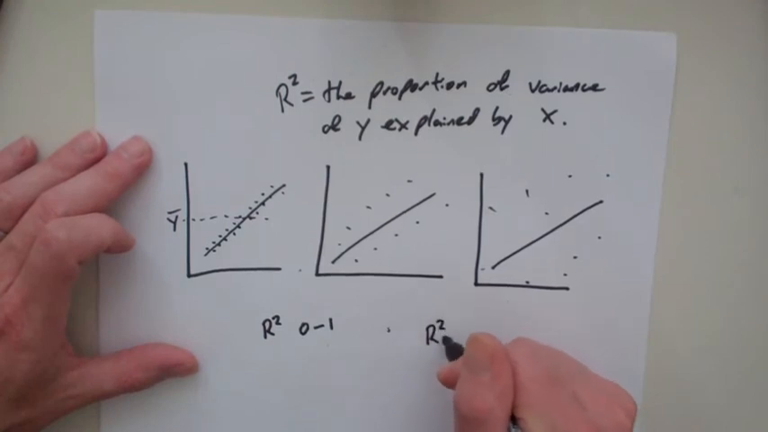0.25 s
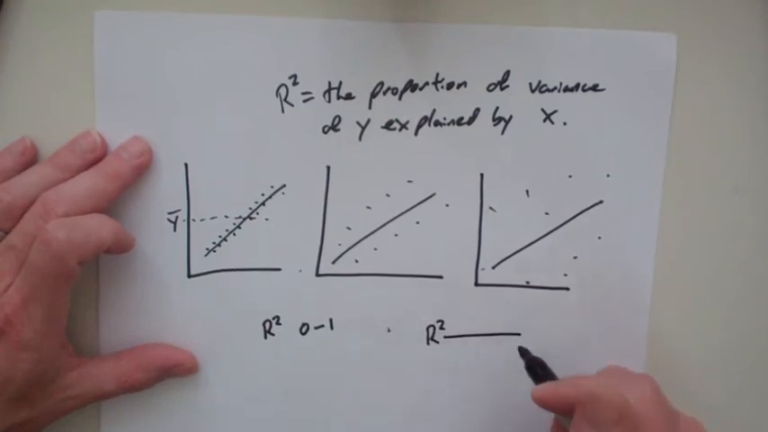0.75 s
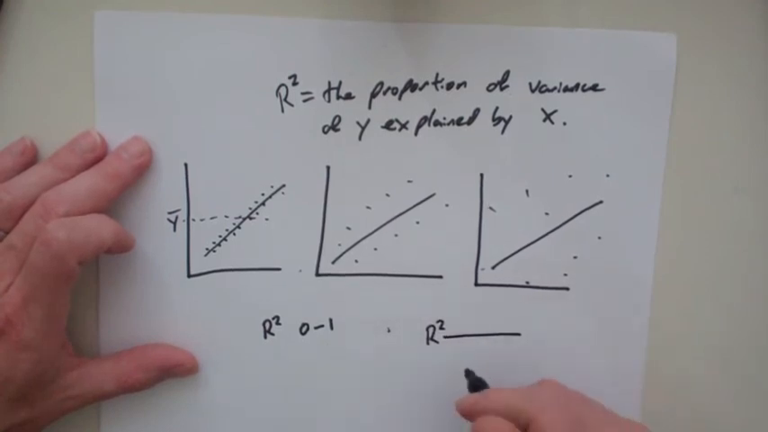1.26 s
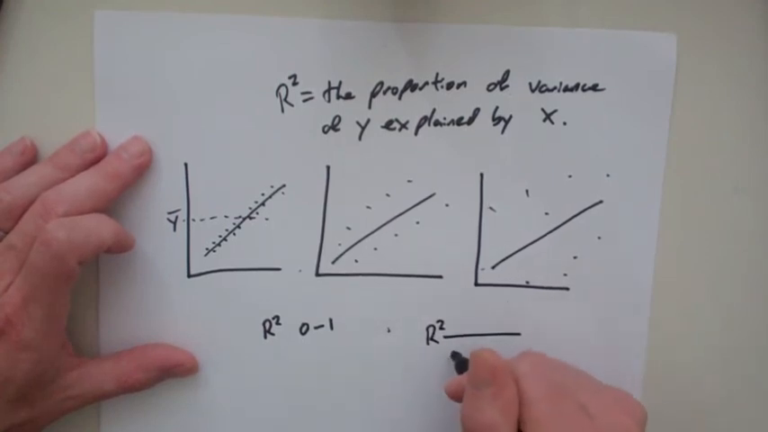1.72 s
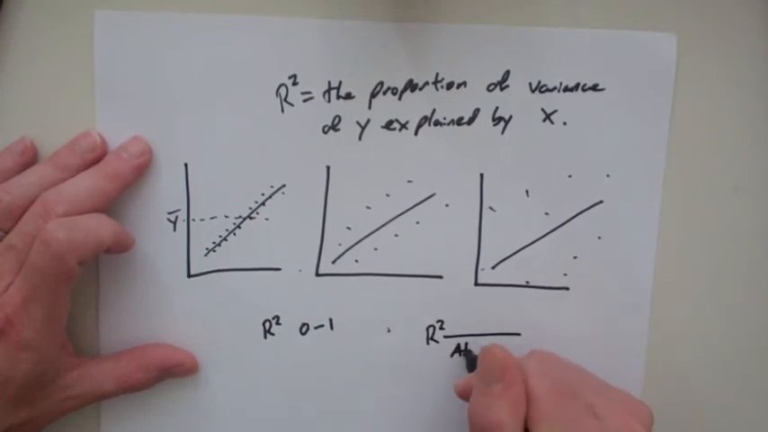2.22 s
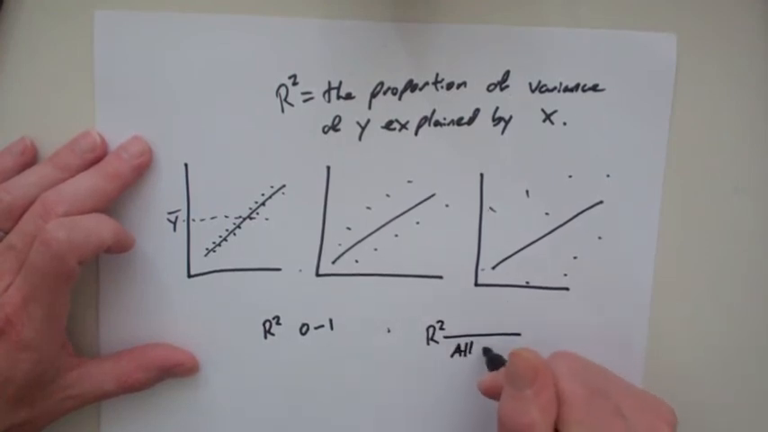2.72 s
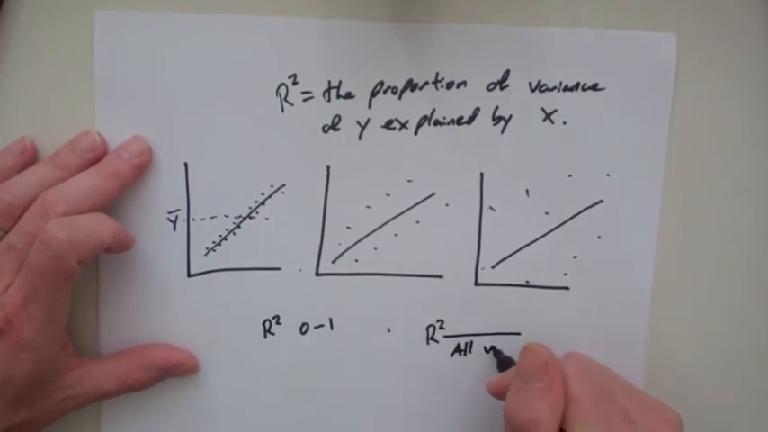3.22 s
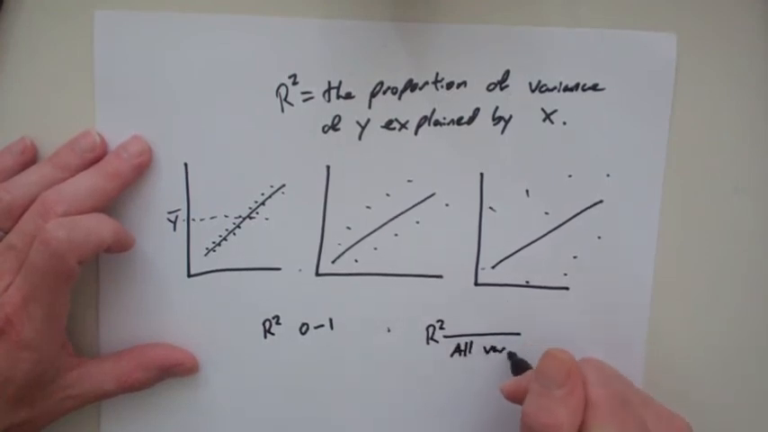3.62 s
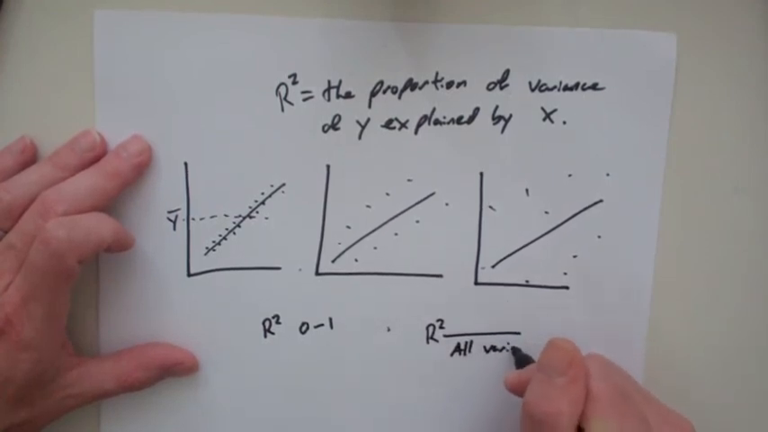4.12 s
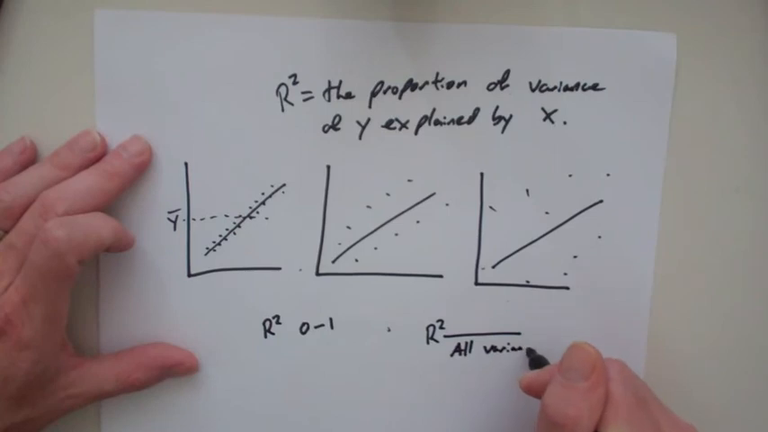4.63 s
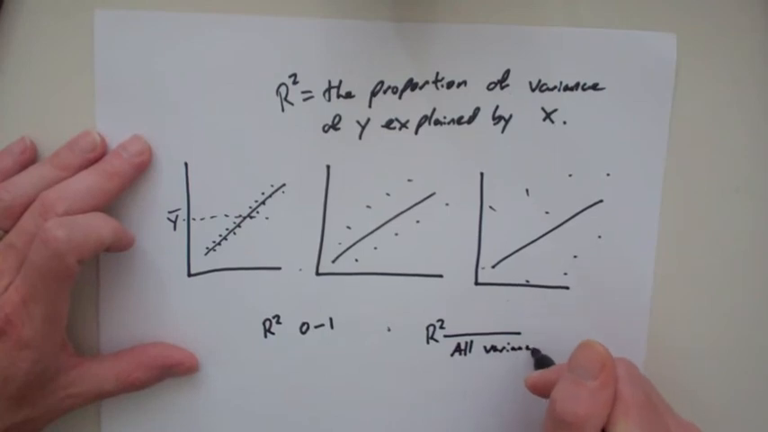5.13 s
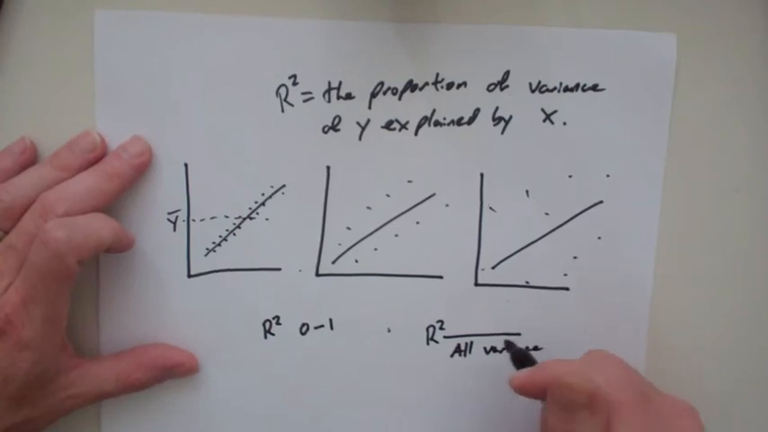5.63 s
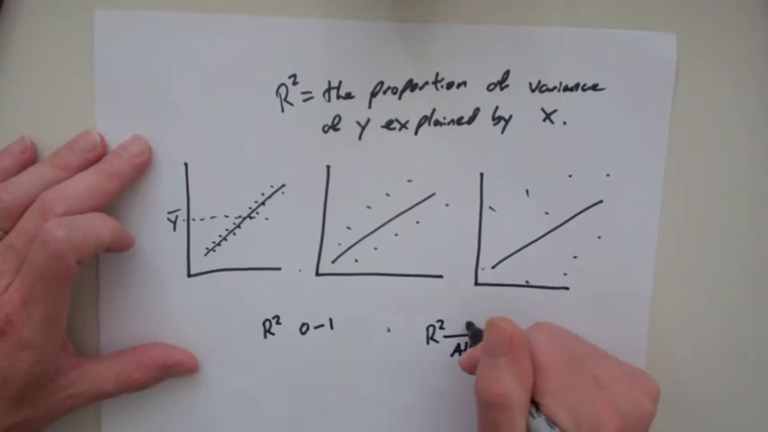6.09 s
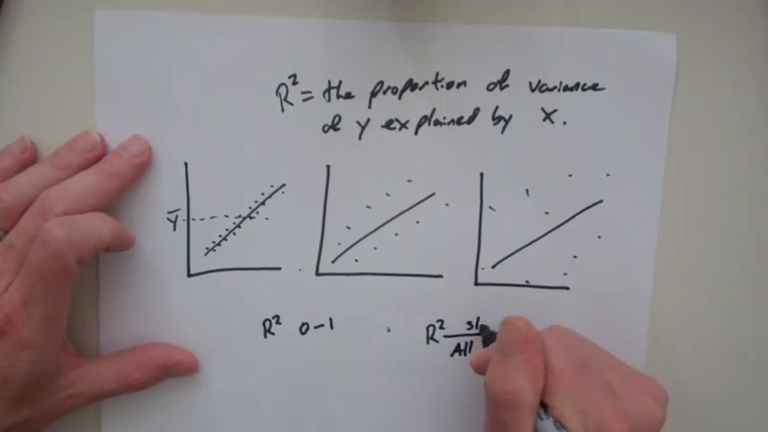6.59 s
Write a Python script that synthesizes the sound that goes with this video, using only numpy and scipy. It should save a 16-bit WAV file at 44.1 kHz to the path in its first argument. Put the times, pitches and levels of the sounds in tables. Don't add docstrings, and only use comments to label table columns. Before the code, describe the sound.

Dry, bright scratches of a marker on paper at a desk, heard very close with little room echo. A half-second of ruling a line leads to a hard plastic click, by far the loudest event. Afterwards quick flicks, rounded strokes and small taps come letter by letter, mixed with faint skin rustle on the sheet, over low fan hum and light hiss.

```python
import sys
import numpy as np
from scipy import signal
from scipy.fft import rfft, irfft, next_fast_len
from scipy.io import wavfile
from scipy.ndimage import uniform_filter1d

SR = 44100
rng = np.random.default_rng(int(sys.argv[2]) if len(sys.argv) > 2 else 0)


def generate_wav(sig):
    pcm = np.round(np.clip(np.atleast_2d(sig).T, -1, 1) * 32767).astype(np.int16)
    wavfile.write(sys.argv[1], SR, pcm)


def undo_db(level):
    steps = np.asarray(level, float) / 20
    return 10 ** steps


N = 302305


def unit(x):
    return x / np.sqrt(np.mean(x ** 2) + 1e-20)


def along(points, hz):
    f, v = np.transpose(points)
    return np.interp(np.log(hz + 1), np.log(f + 1), v)


def filtered(x, response):
    m = next_fast_len(x.shape[-1] + 8192)
    spectrum = rfft(x, m) * response(np.fft.rfftfreq(m, 1 / SR))
    return irfft(spectrum, m)[..., :x.shape[-1]]


def coloured(x, colour):
    return filtered(x, lambda hz: undo_db(along(colour, hz)))


def modes(table):
    def response(f):
        total = 0
        for k, (centre, width, db) in enumerate(table):
            resonance = 1j * f * width / (centre * centre - f * f + 1j * f * width)
            total = total + (-1) ** k * undo_db(db) * resonance
        return total
    return response


def swell(t, peak_s, db, rise_s, hold_s, fade_s, sag=0):
    swing_db = 25
    held_s = max(hold_s, 0)
    rise = np.minimum(t - peak_s, 0) / max(rise_s, .002)
    fade = np.maximum(t - peak_s - held_s, 0) / max(fade_s, .004)
    return db + swing_db * (rise - fade) - sag * np.clip(t - peak_s, 0, held_s)


# (start t/s, peak level/dB, hold t/s, fade t/s, brightness level/dB)
FLICKS = [(1.761, -28.5, 0.027, 0.057, 0), (1.865, -34, 0.027, 0.073, 2), (2.249, -32, 0.026, .052, 3.5),
          (2.434, -34.5, 0.042, .028, 3), (2.825, -43.5, 0.023, 0.056, 4.5),
          (3.477, -35, 0.0026, 0.038, -3), (4.087, -44.5, .003, 0.029, -0.5),
          (4.441, -47, .003, .024, -5.5), (4.857, -53, .005, 0.093, 2), (5.27, -43.5, .02, .045, -2.5),
          (5.347, -48, 0.032, .03, -1), (6.437, -38, .02, .06, 2), (6.63, -53.5, .055, .03, 2)]
# (start t/s, landing level/dB, hold t/s, fade t/s, brightness level/dB)
PUSHES = [
    (0.0, -54.5, 0.028, 0.026, -0.5),
    (2.053, -49.5, 0.02, 0.043, -1.5),
    (2.901, -37.5, .02, 0.036, -1),
    (3.184, -49, 0.022, 0.052, 2.5),
    (6.069, -49.5, .018, 0.024, -3),
    (6.129, -49, 0.017, .08, 2),
]
# (peak t/s, peak level/dB, rise t/s, fade t/s, brightness level/dB)
CURLS = [(3.28, -45, .04, 0.018, -1.5), (3.326, -55.5, .05, .045, 7), (3.56, -53, .06, 0.027, 4),
         (4.166, -49.5, 0.04, 0.028, -3.5), (4.218, -54.5, .06, .045, 5), (4.842, -40, 0.011, 0.018, -2.5),
         (5.43, -42, 0.084, 0.039, -0.5), (6.21, -43.5, 0.046, 0.053, 0.5), (6.25, -45, 0.074, 0.017, 2.5),
         (6.708, -43.5, 0.035, 0.029, -2), (6.729, -36, .018, 0.0086, 2), (6.758, -48.5, 0.046, .045, 1)]
# (t/s, scratch level/dB, brightness level/dB)
LINE = [
    (0.408, -56, -1),
    (0.414, -47, -3),
    (0.428, -40, -3.5),
    (0.467, -36, -1.5),
    (0.549, -34.5, 0),
    (0.621, -43, -2.5),
    (0.66, -59.5, 1),
]


def pen():
    lead, n = SR // 12, SR // 6
    out, t = np.zeros((2, N + SR)), np.arange(n) / SR
    landed = [(row, 0.0057, 96) for row in FLICKS]
    landed += [(row, 0.0096, -150) for row in PUSHES]
    for (s, db, hold_s, fade_s, bright_db), rise_s, sag in landed:
        level = swell(t, rise_s, db, rise_s, hold_s, fade_s, sag)
        out[:, round(s * SR):][:, :n] += stroke(level, bright_db)
    for s, db, rise_s, fade_s, bright_db in CURLS:
        level = swell(t, lead / SR, db, rise_s, 0, fade_s)
        out[:, round(s * SR) - lead:][:, :n] += stroke(level, bright_db)
    s, db, bright_db = np.transpose(LINE)
    at = np.arange(SR // 3, SR * 3 // 4)
    level = np.interp(at / SR, s, db, -200, -200)
    out[:, at] += stroke(level, np.interp(at / SR, s, bright_db), ruled=True)
    return ports(*out[:, :N])


# (f/Hz, level/dB per Hz)
SCRATCH = [(590, -58), (1000, -28.5), (1510, -23.5), (1610, -15.5), (1780, -19), (1940, -15), (2530, -18),
           (2990, -10.5), (3950, -18), (6210, -8), (6870, -12), (8380, -5.5), (11100, -9.5), (12900, -1),
           (14100, -1)]
# (f/Hz, level/dB per Hz)
RULED = [(590, -49), (1000, -32), (1320, -9), (1520, -29), (1630, -10.5), (2190, -10), (2590, -5),
         (4820, -9), (5320, -4.5), (6080, -10.5), (6570, -4.5), (8110, -9.5), (9460, -0.5), (10800, -6.5),
         (14100, -1)]
# (f/Hz, width f/Hz, level/dB)
DESK = [(593, 41, -5), (693, 14, 1.5), (784, 96, -3), (930, 50, 1), (1230, 340, -9)]


def stroke(db, bright_db, ruled=False):
    n = len(db)
    colour, catch_db = (RULED, .8) if ruled else (SCRATCH, 2.5)
    grains = fibres(n, colour, grain_db=1.2, catch_db=catch_db, comb_db=1.5)
    low = filtered(grains, lambda hz: hz < 4500)
    top = filtered(grains, lambda hz: hz > 11000)
    middle = grains - low - top
    desk = filtered(rng.standard_normal((2, n)), modes(DESK))
    harder_db = np.maximum(db + 50.5, -8)
    low_db = db - 5.5 - 0.36 * harder_db - bright_db
    top_db = db + 6 + 0.16 * harder_db + 0.82 * bright_db
    desk_db = low_db - 0.56 * np.maximum(low_db + 68.5, 0)
    layers = [(middle, db), (low, low_db), (top, top_db), (desk, desk_db)]
    return sum(unit(x) * undo_db(level) for x, level in layers)


def fibres(n, colour, grain_db, catch_db, comb_db):
    catches = uniform_filter1d(rng.standard_normal(n), size=50)
    sizes = undo_db(grain_db * rng.exponential(size=n) + catch_db * np.clip(unit(catches), -3, 2))
    plucks = unit(sizes * rng.standard_normal((2, n)))
    comb = rng.standard_normal(size=60)

    def response(hz):
        return undo_db(along(colour, hz) + comb_db * np.interp(hz / 300, np.arange(len(comb)), comb))
    return filtered(plucks, response)


# (t/s, peak level/dB, desk knock against it level/dB, ring f/Hz, ring against crack level/dB)
TICKS = [(0.3845, -45.5, -8, 4400, 0), (0.7035, -45, -21, 6500, 0), (0.865, -37.5, -30, 13300, -15),
         (1.1203, -44, -27, 7710, -9), (3.868, -40, -24, 13400, -8), (4.092, -39.5, -23, 7650, 2),
         (4.4464, -34, -24, 7700, -7), (4.8384, -36.5, -19, 13700, -6), (5.3531, -39, -18, 2830, -7),
         (6.0735, -42, -3, 3090, -14), (6.7256, -30, -21, 13500, -6)]
# (f/Hz, width f/Hz, level/dB)
KNOCK = [(692, 60, 0)]


def ticks():
    crack, knock, t = np.zeros((2, N + SR)), np.zeros(N + SR), np.arange(SR // 10) / SR
    n = len(t)
    for s, db, knock_db, ring_hz, ring_db in TICKS:
        start = round(s * SR)
        ring = modes([(ring_hz, 700, ring_db + 6)])
        burst = filtered(rng.standard_normal((2, n)), lambda hz: undo_db(along(SCRATCH, hz)) + ring(hz))
        crack[:, start:][:, :n] += undo_db(db + 3.5 - 60 * t / 0.014) * unit(burst)
        push = undo_db(-60 * t / 0.18) * rng.standard_normal(n)
        knock[start:][:n] += undo_db(db + knock_db - 10) * unit(filtered(push, modes(KNOCK)))
    return ports(*crack[:, :N]) + knock[:N]


# (t/s, peak level/dB, room answer level/dB)
SNAP = (1.2235, -7.5, -22)
# (f/Hz, width f/Hz, level/dB)
PLASTIC = [(1720, 340, -14), (2620, 560, -3.5), (3970, 1000, -4.5), (5000, 420, 0), (6030, 700, 1),
           (7120, 480, -3), (7600, 350, -15), (9500, 840, 2.5), (11500, 1500, -4.5), (14000, 1100, 5)]
# (f/Hz, width f/Hz, level/dB)
ANSWER = [(2660, 560, 6), (4070, 660, 7.5), (5900, 730, 7), (6900, 640, 10), (9000, 2200, 4),
          (14200, 1300, 11)]


def snap():
    s, db, room_db = SNAP
    out, lead = np.zeros((2, N)), SR // 20
    t = (np.arange(SR // 2) - lead) / SR
    creak = np.exp(np.where(t < 0, t / 0.0024, -t / 0.00073))
    blows = 0.053 * creak * rng.standard_normal((2, len(t)))
    blows[0, [lead - 52, lead - 20, lead + 10]] += [.6, .55, 1.15]
    blows[1, [lead - 35, lead + 14]] += [.6, 1]
    crack = ports(*filtered(blows, lambda hz: modes(PLASTIC)(hz) * (hz > 1400)))
    thud = filtered(blows[0], modes(DESK))
    tail = unit(filtered(rng.standard_normal(blows.shape), modes(ANSWER)))
    onset = np.clip((t - .003) / 0.0077, 0, 1)
    answer = onset * undo_db(room_db - 60 * np.abs(t) / 0.34) * tail
    sound = undo_db(16.5) * crack + 1.54 * thud + answer
    out[:, round(s * SR) - lead:][:, :len(t)] = undo_db(db) * sound
    return out


# (peak t/s, peak level/dB, rise t/s, fade t/s)
BRUSH = [(.156, -55.5, .12, .08), (.728, -53.5, .09, .24), (.866, -55, .015, 0.018), (.94, -56.5, 0.03, .1),
         (.99, -50, 0.11, 0.093), (1.45, -58.5, .07, .12), (2.575, -57, 0.024, .1),
         (2.63, -49, 0.14, 0.079), (3.724, -61, .05, .04), (3.872, -55, .005, .025),
         (3.94, -60.5, .2, .045), (4.516, -58, 0.17, .06), (4.628, -57, .1, .07), (5.53, -53.5, .11, 0.28)]
# (f/Hz, level/dB per Hz)
SKIN = [(1180, -47), (2000, -16.5), (3270, -7), (5080, -8.5), (11200, -8.5), (13200, -3.5), (14100, -3.5)]


def hand():
    t = np.arange(0, N, 16) / SR
    swells = sum(undo_db(swell(t, s, db, rise_s, 0, fade_s)) for s, db, rise_s, fade_s in BRUSH)
    level = np.interp(np.arange(N) / SR, t, swells)
    shared, own = rng.standard_normal(N), rng.standard_normal((2, N))
    return level * undo_db(7.0) * unit(coloured(0.64 * shared + own, SKIN))


# (f/Hz, likeness 0-1)
ALIKE = [(1000, 0.91), (2500, 0.98), (4000, 0.92), (5500, 0.5), (7000, 0.27), (8500, 1), (10500, 0.34),
         (13200, 0.6)]
# (f/Hz, phase/rad)
LEAD = [(4500, 0.16), (6000, 1.7), (8000, 0.71), (10000, 1.95), (14000, 2.02)]
# (f/Hz, level/dB)
LEAN = [(4000, -0.5), (7500, -0.5), (9000, 0.5), (12000, -0.5), (14000, -6)]


def ports(a, b):
    def turn(hz):
        return np.arccos(np.clip(along(ALIKE, hz), 0, 1)) / 2

    def half(hz):
        return undo_db(along(LEAN, hz) / 2) * np.exp(-.5j * along(LEAD, hz))
    mid = filtered(a, lambda hz: np.cos(turn(hz)))
    side = filtered(b, lambda hz: np.sin(turn(hz)))
    return np.array([filtered(mid + side, half), filtered(mid - side, lambda hz: 1 / half(hz))])


def room(x):
    t = np.arange(SR // 3) / SR
    tail = rng.standard_normal((2, len(t))) * undo_db(-60 * t / 0.29) * (t > .006)
    return signal.fftconvolve(x, tail / np.linalg.norm(tail[0]), axes=1)[:, :N]


# (f/Hz, width f/Hz, level/dB)
HUM = [(78.8, 16.6, -8.5), (101, 14.4, -14), (141, 15, -4), (163.7, 14.2, -0.5), (192.2, 12.4, -2.5),
       (230, 11.2, -6.5), (261.2, 9, -5), (290.5, 7.2, -5.5), (352.3, 4.3, -7), (403.3, 7.1, 1.5),
       (443.8, 15.4, -6.5), (463.2, 16, -3.5), (509, 19, -11.5), (589, 8.2, -20)]
# (f/Hz, level/dB per Hz)
AIR = [(25, -25), (60, -22), (150, -6), (300, -13), (600, -20), (1000, -26.5), (1500, -37), (3000, -46.5)]


def ventilation():
    ringing = filtered(rng.standard_normal(N), lambda hz: modes(HUM)(hz) / (1 + (hz / 620) ** 4))
    whine = undo_db(-64.5) * np.sin(2 * np.pi * 401 * np.arange(N) / SR)
    hum = undo_db(-50) * unit(ringing) + whine
    sway = undo_db(-70) * unit(filtered(rng.standard_normal(N), modes(HUM[5:])))
    air = unit(coloured(rng.standard_normal((3, N)), AIR))
    apart = filtered(air[1:], lambda hz: np.clip(hz / 1400, .18, .9))
    return hum + np.outer([1, -1], sway) + undo_db(-54) * (air[0] + apart)


def scene():
    near = pen() + ticks()
    wet = undo_db(-17) * room(near)
    return near + wet + hand() + snap() + ventilation()


# (start t/s, length t/s, f/Hz)
GAPS = [(.45, .09, 5030), (.54, .09, 4860), (.52, .08, 4480), (1.195, .02, 4700), (1.24, .09, 3190),
        (1.24, .09, 5350), (1.24, .09, 7900), (1.78, .08, 4010), (1.89, .04, 4520), (2.45, .05, 4180),
        (2.83, .06, 4310), (2.84, .03, 5200), (2.94, .04, 4270), (3.82, .04, 3350), (4.19, .04, 4300),
        (6.44, .03, 5170), (6.74, .05, 4560)]


def gaps(x):
    width_hz, sinks_hz_per_s = 320, 700
    hz, t, z = signal.stft(x, SR, nperseg=768, noverlap=576)
    keep = np.ones(z.shape[1:])
    for s, length, start_hz in GAPS:
        centre = start_hz - sinks_hz_per_s * (t - s)
        in_band = np.abs(hz[:, None] - centre) < width_hz / 2
        keep[in_band & (t > s) & (t < s + length)] = .03
    return signal.istft(z * keep, SR, nperseg=768, noverlap=576)[1][:, :N]


def roll_off(x):
    return signal.sosfilt(signal.butter(12, 15310, fs=SR, output="sos"), x)


# (f/Hz, level/dB per Hz)
HISS = [(880, -33), (1500, -3), (1560, -3), (4890, -4.5), (5840, -4.5), (7670, -5.5), (14100, -1.5)]
# (f/Hz, level/dB)
EDGE = [(14150, 0), (14300, -35), (14600, -43), (15000, -62), (16000, -72)]


def record(dry):
    noise = rng.standard_normal((2, N))
    hiss = undo_db(-54) * unit(filtered(noise, lambda hz: undo_db(along(HISS, np.maximum(hz, 1600)))))
    limited = coloured(gaps(dry + hiss), EDGE)
    return roll_off(limited)


dry = scene()
out = record(dry)
generate_wav(out)
```